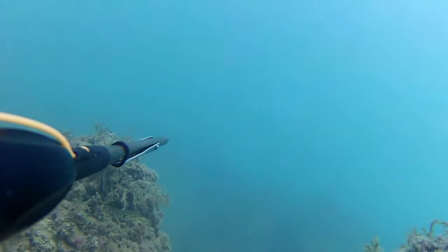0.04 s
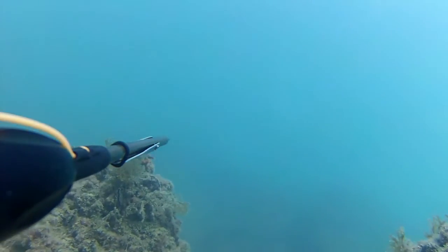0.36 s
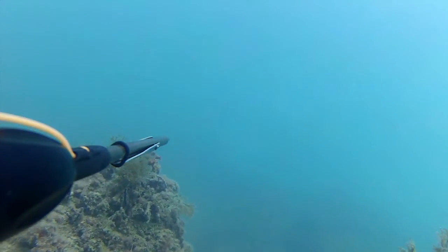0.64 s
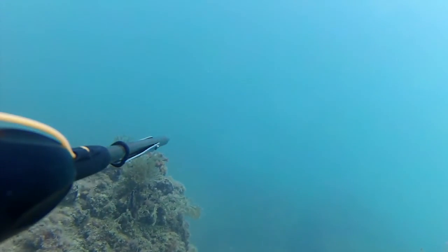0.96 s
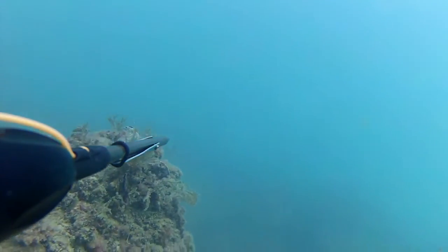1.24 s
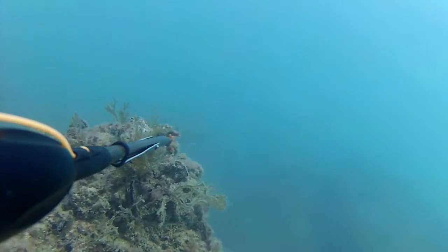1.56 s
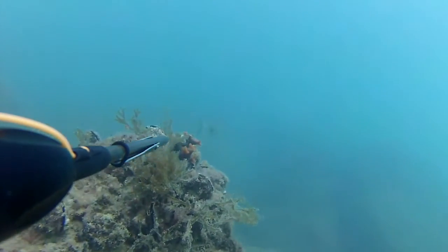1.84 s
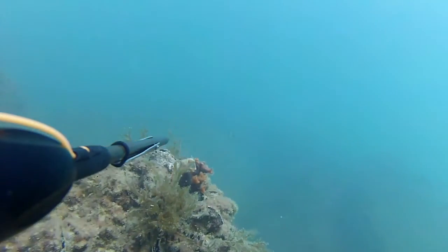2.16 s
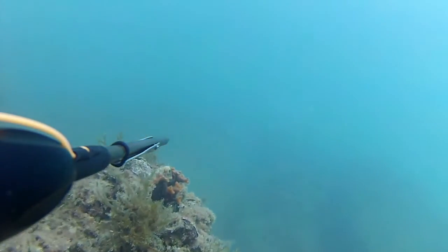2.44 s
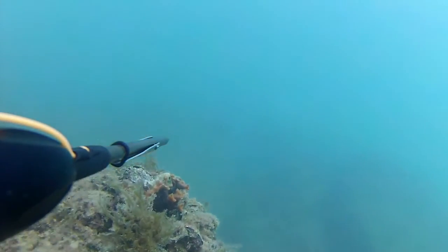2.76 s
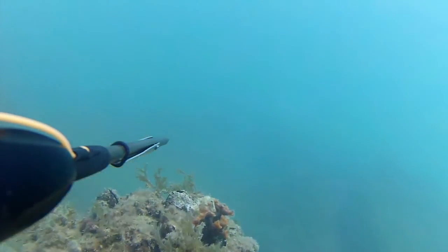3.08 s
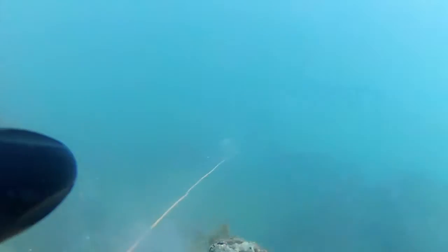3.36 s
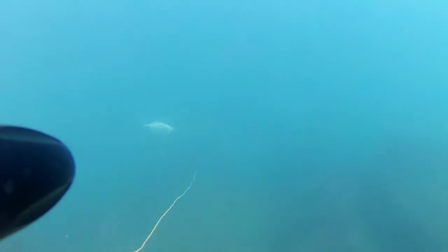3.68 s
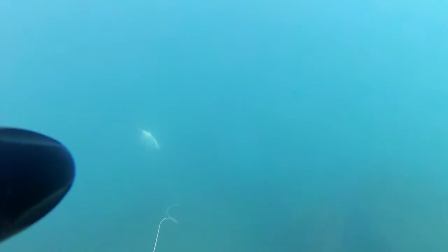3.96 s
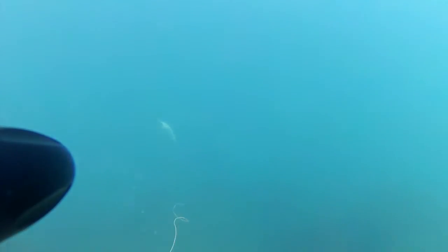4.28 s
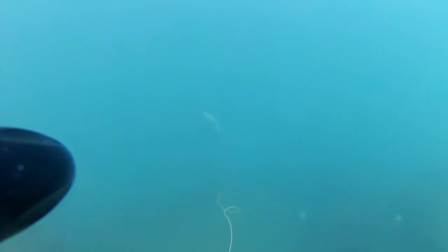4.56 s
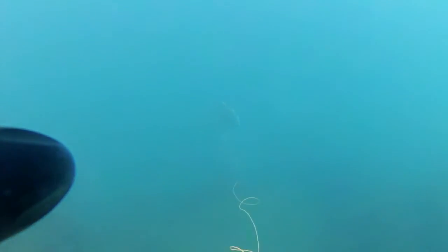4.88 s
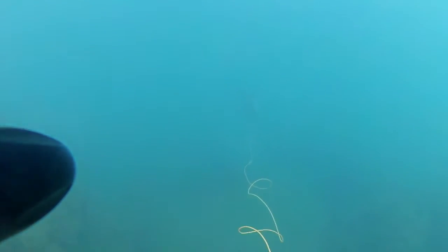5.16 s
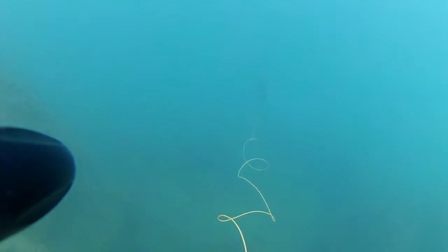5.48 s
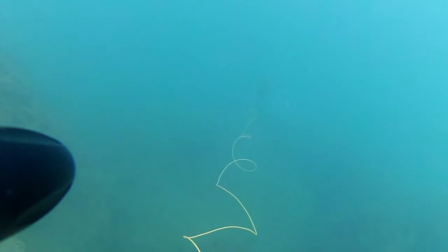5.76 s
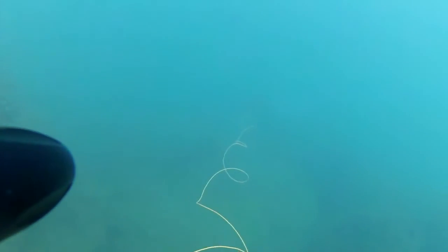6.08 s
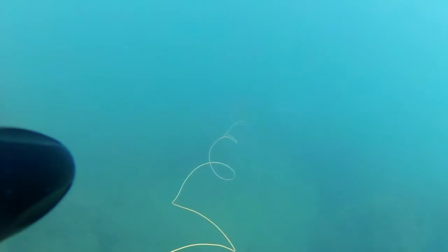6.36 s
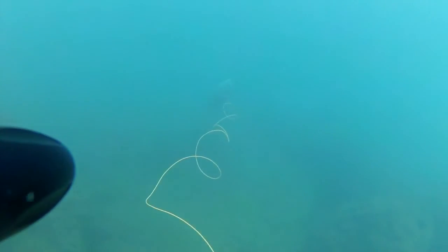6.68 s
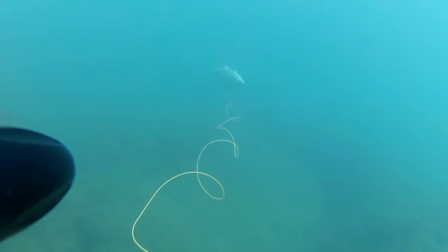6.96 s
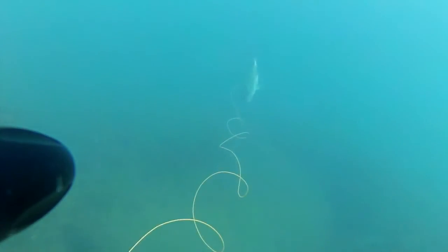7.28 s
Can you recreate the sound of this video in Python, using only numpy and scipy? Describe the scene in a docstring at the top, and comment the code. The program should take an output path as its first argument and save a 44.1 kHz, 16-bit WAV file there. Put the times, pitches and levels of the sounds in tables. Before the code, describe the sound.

Throughout, snapping shrimp crackle faintly on an underwater reef, with scattered closer clicks over a soft hiss, a low wash and a faint, steady high tone from the camera housing. Soft knocks and scuffs of gear come around 0.7 to 1.5 seconds and just before 3. At about 3.2 seconds a speargun fires right beside the microphone: a brief scrape and three rapid thuds run into one hard, slightly distorted crack, by far the loudest sound. Bubbles fizz, water surges and the line rattles out while the background briefly dips. A small bubble blips at 3.6 seconds, the steel shaft clinks at 3.7, and the line tugs with a soft, low thump at 3.9. The crackle continues, with sharper snaps at 4.5 and 4.9 seconds. Between 6.5 and 7.1 seconds come quiet knocks, a short creak of the line and a light scuff.

```python
"""Snapping shrimp crackle all round over a low wash of water, heard on a reef from inside a camera
housing that they keep faintly ringing. Right beside the microphone a speargun fires: the shaft scrapes
out, three pressure pulses hit and duck the gain, then a hard crack overloads the input and the
background stays low for a moment. The line runs out, tugs at the gun and later creaks."""
import sys
import numpy as np
from scipy import signal
from scipy.fft import rfft, irfft
from scipy.io import wavfile
from scipy.ndimage import map_coordinates

SR = 44100
rng = np.random.default_rng(int(sys.argv[2]) if len(sys.argv) > 2 else 0)


def wrap_up_sound(samples):
    """Save the sound to the file named by the first command line argument, as 16-bit audio."""
    columns = np.atleast_2d(samples).T
    # keep every value between -1 and 1, then stretch to whole-number steps
    tamed = np.clip(columns, -1, 1)
    steps = np.round(tamed * 32767).astype(np.int16)
    wavfile.write(sys.argv[1], SR, steps)


N = 322812
TIME = np.arange(N) / SR
AGE = TIME[:SR // 4]  # seconds since the start of one short sound
FIRE_AT, CRACK_AT = 3.195, 3.2579  # the shaft starts to move; the gun's stroke ends [s]


def amp(db):
    """Decibels to gain."""
    return 10 ** (np.asarray(db) / 20)


def unit(x):
    """Scaled to rms 1."""
    return x / np.sqrt(np.mean(x ** 2) + 1e-20)


def fade(t60, age=AGE):
    """A decay of 60 dB in t60 seconds."""
    return np.exp(-np.log(1000) * age / t60)


def envelope(start, attack, hold, t60):
    """Rises from start, holds, then dies away; all in seconds."""
    age = np.maximum(TIME - start, 0)
    return (1 - np.exp(-age / attack)) * fade(t60, np.maximum(age - hold, 0))


def curve(rows):
    """One value per sample from (time, value) points."""
    return np.interp(TIME, *np.transpose(rows))


def add(track, at, sound):
    """Mixes a sound in at the given second."""
    part = track[round(at * SR):][:len(sound)]
    part += sound[:len(part)]


def coloured(x, points, size=4096):
    """x through a minimum-phase filter shaped by (Hz, dB) points."""
    hz, db = np.transpose(points)
    gain = amp(np.interp(np.log(np.fft.rfftfreq(size, 1 / SR) + 1), np.log(hz), db))
    cepstrum = irfft(np.log(gain))
    cepstrum[1:size // 2] *= 2
    cepstrum[size // 2 + 1:] = 0
    return signal.fftconvolve(x, irfft(np.exp(rfft(cepstrum))))[:len(x)]


def noise(points, count=N):
    """Coloured noise of rms 1."""
    return unit(coloured(rng.standard_normal(count), points))


def wobble(rate):
    """A wandering random curve, rate knots a second."""
    knots = rng.standard_normal(int(N * rate / SR) + 4)
    return map_coordinates(knots, [TIME * rate], order=1)


def ring(modes, spread_db):
    """Damped modes of alternating sign, struck at slightly new strengths each time."""
    out = np.zeros(len(AGE))
    for k, (hz, db, t60) in enumerate(modes):
        strength = (-1) ** k * amp(db + spread_db * rng.standard_normal())
        out += strength * fade(t60) * np.sin(2 * np.pi * hz * AGE)
    return out


def burst(colour, t60):
    """A short dying burst of coloured noise; peak 1."""
    x = coloured(rng.standard_normal(len(AGE)) * fade(t60), colour)
    return x / np.abs(x).max()


# The hiss of the sea all round (frequency [Hz], level [dB])
SEA_COLOUR = [(15, -31.5), (25, -4.5), (64, 1), (433, -5), (1020, -11), (1340, -11), (2170, -18.5),
              (2490, -15), (2770, -16), (4620, -22.5), (6550, -18.5), (10100, -23), (10900, -23.5),
              (12800, -22), (15500, -32.5)]
# Water flowing past the housing (time [s], level [dB])
WASH_LEVEL = [(0, -66.5), (.8, -72), (1.5, -60), (2.3, -54), (3.7, -56.5), (4.4, -65), (5.4, -68.5),
              (6.4, -64), (7.3, -63)]
# Its rumble at the microphone (frequency [Hz], level [dB])
WASH_COLOUR = [(10, -13), (28, -2), (48, 1.5), (80, -14), (200, -31), (600, -70)]
# The gun moves close by and stirs the water (middle [s], half length [s], level [dB])
SWIRLS = [(0.146, .06, -59), (0.386, .07, -60.5), (3.919, .25, -61), (6.749, .25, -65.5)]
# Stirred water, close up (frequency [Hz], level [dB])
CHURN_COLOUR = [(15, -15.5), (45, -1), (180, -2), (450, -7.5), (900, -21), (1600, -40), (4000, -68.5)]
def water(tone_hz=2520, tone_width_hz=170, tone_db=-75, flutter_db=4.5, hiss_db=-61.5):
    """Steady hiss, a low wash, soft swirls, and the housing resonance singing unevenly."""
    resonance = np.exp(-np.pi * tone_width_hz * AGE) * np.sin(2 * np.pi * tone_hz * AGE)
    drive = rng.standard_normal(N) * amp(flutter_db * wobble(40))  # stands for the shrimp's crackle
    tone = amp(tone_db) * unit(signal.fftconvolve(drive, resonance)[:N])
    hiss = amp(hiss_db) * noise(SEA_COLOUR)
    wash = amp(curve(WASH_LEVEL)) * noise(WASH_COLOUR)
    stir = sum(amp(db) * np.exp(-((TIME - at) / half) ** 2) for at, half, db in SWIRLS)
    return hiss + wash + stir * noise(CHURN_COLOUR) + tone


# One shrimp snap as it reaches the microphone (frequency [Hz], level [dB])
SNAP_COLOUR = [(100, -12), (700, -4), (1300, -1), (1700, -6), (2400, -0.5), (4000, -2), (5300, -3),
               (6400, -5.5), (8800, -4), (11000, -10.5), (15500, -12.5)]
# Modes of the housing round the microphone (frequency [Hz], level [dB], t60 [s])
HOUSING_MODES = [(1322, -24, .039), (1984, -22, .025), (2500, -15.5, 0.031)]
def snap(treble_db, rise=0.000091, burst_t60=0.0049, scatter_db=-20, scatter_t60=.05):
    """A collapsing bubble: a very short burst, scatter off the rocks, and the housing's ring; peak 1."""
    pop = rng.standard_normal(len(AGE)) * (fade(burst_t60) + amp(scatter_db) * fade(scatter_t60))
    onset = 1 - np.exp(-AGE / rise)
    click = onset * (coloured(pop, SNAP_COLOUR) + ring(HOUSING_MODES, spread_db=2.5))
    click = coloured(click, [(2500, 0.00076), (6000, treble_db)])
    return click / np.abs(click).max()


# Distant patches of reef, each with its own pitch of crackle (frequency [Hz], level [dB])
REEF_PATCHES = [(1400, -3.5), (2500, -3.5), (6200, -2), (6900, -1.5), (7500, -1), (8700, 0), (9800, -1.5),
                (12500, -2)]
def far_shrimp(rate=17, spread_db=7.5, far_db=-56, skirt_db=-17):
    """A crowd of far snaps, about rate a second from each patch of reef."""
    out = np.zeros(N)
    for hz, db in REEF_PATCHES:
        band = [(hz / 2, skirt_db), (hz, 0), (hz * 2, skirt_db)]
        voices = [coloured(snap(treble_db=0)[:2048], band) for _ in range(5)]
        times = np.cumsum(rng.exponential(1 / rate, size=250))
        peaks = amp(far_db + db + spread_db * np.minimum(rng.standard_normal(len(times)), 2))
        for k, at in enumerate(times):
            click = voices[k % len(voices)]
            add(out, at, peaks[k] * click / np.abs(click).max())
    return out


def stray_shrimp(count=38, level_db=-45, spread_db=3, treble_db=1, treble_spread_db=11):
    """Chance snaps in the middle distance; the nearer the microphone, the louder and brighter."""
    out = np.zeros(N)
    for k, (offset, nearness) in enumerate(rng.uniform([0, -1], [1, 1], (count, 2))):
        click = snap(treble_db + treble_spread_db * nearness)
        add(out, (k + offset) / count * N / SR, amp(level_db + spread_db * nearness) * click)
    return out


# The shrimp nearest the microphone (time [s], level [dB], treble [dB])
NEAR_SNAPS = [(0.0833, -38, 5), (0.4314, -40.5, -5.5), (1.0021, -35, 19), (1.2528, -37.5, -12),
              (2.0712, -30.5, 3.5), (2.358, -38.5, -5.5), (2.617, -36, 23), (2.6482, -26.5, 12.5),
              (4.2067, -35, -4), (4.3326, -37.5, -4), (4.5004, -24.5, 0.5), (4.6547, -35.5, -0.5),
              (4.9146, -22, 2), (5.147, -34.5, -10.5), (5.2208, -37.5, -7), (5.4312, -35.5, 2),
              (6.0115, -35, 12), (6.2208, -35.5, 4), (6.4922, -42, -16), (7.2449, -38.5, -1)]
def near_shrimp():
    """Single loud snaps from the rock under the gun."""
    out = np.zeros(N)
    for at, db, treble_db in NEAR_SNAPS:
        add(out, at, amp(db) * snap(treble_db))
    return out


# Knocks on the grip, close by (time [s], level [dB], t60 [s])
GRIP_KNOCKS = [(1.326, -42.5, 0.012), (1.535, -43, 0.048), (6.495, -48.5, 0.027), (6.657, -45.5, .029)]
# A dull knock on the gun (frequency [Hz], level [dB])
KNOCK_COLOUR = [(40, -25), (110, -4), (200, 0.5), (310, -2.5), (440, -1), (620, -6.5), (1400, -16),
                (1900, -38), (6000, -45)]
# Gear scuffing near the housing (time [s], level [dB], t60 [s])
GEAR_SCUFFS = [(.718, -44.5, .026), (1.256, -42, .11), (2.938, -39, 0.074), (7.088, -41.5, .11)]
# The crunch of one scuff (frequency [Hz], level [dB])
SCUFF_COLOUR = [(300, -4), (900, -3), (1350, 15.5), (1750, -1), (2500, 12), (3500, -4), (4500, -10),
                (12000, -11.5)]
def handling():
    """The grip knocks dully; gear scuffs in brighter crunches."""
    out = np.zeros(N)
    for rows, colour in (GRIP_KNOCKS, KNOCK_COLOUR), (GEAR_SCUFFS, SCUFF_COLOUR):
        for at, db, t60 in rows:
            add(out, at, amp(db) * burst(colour, t60))
    return out


# Runs of slips in the taut line, heard through the gun (time [s], length [s], level [dB])
LINE_CREAKS = [(6.727, .045, -41.5), (6.79, .025, -41.5), (6.865, .015, -41.5)]
def line_creaks(slips_per_s=79, slip_t60=0.047, jitter_s=0.0024, spread_db=3.5):
    """The line sticks and slips at an uneven pace; every slip knocks the gun."""
    out = np.zeros(N)
    for start, length, db in LINE_CREAKS:
        for at in np.arange(start, start + length, 1 / slips_per_s):
            late, strength = rng.standard_normal(2)
            slip = amp(db + spread_db * strength) * burst(KNOCK_COLOUR, slip_t60)
            add(out, at + jitter_s * late, slip)
    return out


def line_tug(at=3.929, thump_db=-33, rest_hz=60, start_hz=190, settle=0.008, length=.048, knock_db=-41):
    """The line snaps taut: a knock, and a thump that sinks in pitch as the gun swings."""
    out = np.zeros(N)
    hz = rest_hz + (start_hz - rest_hz) * np.exp(-AGE / settle)
    swell = (1 - np.exp(-AGE / 0.0018)) * np.exp(-(AGE / length) ** 2)
    thump = amp(thump_db) * swell * np.sin(2 * np.pi * np.cumsum(hz) / SR)
    add(out, at, amp(knock_db) * burst(KNOCK_COLOUR, t60=.04) - thump)
    return out


# Out on the line, the shaft clinks as it is checked (time [s], level [dB])
SHAFT_CLINKS = [(3.697, -41.5), (3.707, -36.5)]
# Modes of the steel shaft (frequency [Hz], level [dB], t60 [s])
SHAFT_MODES = [(1270, -1.5, 0.073), (2590, -3.5, 0.036), (3120, -4, .024), (5420, -6, .05),
               (7400, -11, .025)]
def shaft_clinks(tick_db=3, knock_db=-1.5):
    """Each contact ticks, knocks the gun and leaves the steel ringing briefly."""
    out = np.zeros(N)
    for at, db in SHAFT_CLINKS:
        knock = amp(knock_db) * burst(KNOCK_COLOUR, t60=0.043)
        steel = .5 * ring(SHAFT_MODES, spread_db=5)
        tick = amp(tick_db) * snap(treble_db=-3)
        add(out, at, amp(db) * (steel + tick + knock))
    return out


def bubble(at=3.6385, db=-38, hz=1330, t60=0.041, rise=.0006):
    """A single bubble breaks loose and rings."""
    out = np.zeros(N)
    add(out, at, amp(db) * (1 - np.exp(-AGE / rise)) * fade(t60) * np.sin(2 * np.pi * hz * AGE))
    return out


# Fine bubbles fizzing beside the housing (frequency [Hz], level [dB])
FIZZ_COLOUR = [(1000, -28.5), (3000, -4.5), (4500, -7.5), (6200, 3), (8000, -2.5), (10000, -1.5),
               (12000, -10.5), (16000, -18.5)]
def bubble_cloud(level_db=-30, speed_power=2.4, spray_db=-27, uneven_db=4):
    """Fine bubbles fizz more as the shaft gathers speed; the crack throws out a last spray of them."""
    speed = np.clip((TIME - FIRE_AT) / (CRACK_AT - FIRE_AT), 0, 1) * (TIME < CRACK_AT)
    trail = amp(level_db) * speed ** speed_power
    spray = amp(spray_db) * envelope(CRACK_AT, attack=.001, hold=.004, t60=0.11)
    return (trail + spray) * amp(uneven_db * wobble(500)) * noise(FIZZ_COLOUR)


def wake(surge_db=-9, eddies_db=-33.5):
    """The shot leaves a short surge of water, then slowly settling eddies."""
    surge = amp(surge_db) * envelope(CRACK_AT, attack=.005, hold=0.025, t60=0.085)
    eddies = amp(eddies_db) * envelope(CRACK_AT, attack=.02, hold=.03, t60=1.05)
    return (surge + eddies) * noise(CHURN_COLOUR)


# Shaft, then loops of line, run over the muzzle (time [s], length [s], rattle [dB], stirred water [dB])
MUZZLE_SCRAPES = [(3.193, .06, -30, -24.5), (3.28, 0.055, -35.5, -33), (3.392, 0.048, -45.5, -34)]
# The muzzle's rattle at close range (frequency [Hz], level [dB])
RATTLE_COLOUR = [(300, -30.5), (900, -6.5), (1350, 5.5), (1700, -4.5), (2000, -12), (2450, -6.5),
                 (3100, -21), (5000, -38.5), (12000, -61)]
def muzzle_scrapes(uneven_db=3.5, hiss_db=-30):
    """Shaft and line rattle unevenly on the muzzle and stir the water as they pass."""
    rattle, stir = np.zeros(N), np.zeros(N)
    for at, length, rattle_db, stir_db in MUZZLE_SCRAPES:
        contact = envelope(at, attack=0.0049, hold=length, t60=0.086)
        rattle += amp(rattle_db) * contact
        stir += amp(stir_db) * contact
    rattle *= amp(uneven_db * wobble(250))
    friction = noise(RATTLE_COLOUR) + amp(hiss_db) * noise(FIZZ_COLOUR)
    return rattle * friction + stir * noise(CHURN_COLOUR)


# Pressure pulses hit the housing as the shaft leaves (time [s], level [dB], sign, rise [s], decay [s])
PRESSURE_PULSES = [(3.212, 5, 1, .00042, .0007), (3.2163, 10, -1, .00005, .00089),
                   (3.2218, 14, 1, .0008, .0012)]
# The crack, right beside the microphone (frequency [Hz], level [dB])
CRACK_COLOUR = [(100, -5.5), (600, 4.5), (2400, 2.5), (4300, -10), (8500, -7), (15000, -17)]
# Modes of the gun's body (frequency [Hz], level [dB], t60 [s])
GUN_MODES = [(48, -10.5, .22), (88, -1, .1), (148, -3, 0.11), (260, -2.5, .06), (423, 10.5, 0.03),
             (611, 15.5, 0.026), (1240, 13.5, .025), (1430, -21, .23), (1697, -23, .17), (1918, 15, .02),
             (2356, 14.5, 0.015), (3300, 5.5, .021), (5200, 4, .019)]
def shot(crack_db=13, crack_t60=.018, rebound_hz=30):
    """Pressure pulses, each with a shallow rebound, then the crack that rings the whole gun."""
    pulses = np.zeros(N)
    for at, db, sign, rise, decay in PRESSURE_PULSES:
        add(pulses, at, sign * amp(db) * (1 - np.exp(-AGE / rise)) * np.exp(-AGE / decay))
    out = signal.lfilter(*signal.butter(1, rebound_hz, "high", fs=SR), pulses)
    crack = amp(crack_db) * fade(crack_t60) * noise(CRACK_COLOUR, count=len(AGE))
    add(out, CRACK_AT, crack - ring(GUN_MODES, spread_db=1))
    return out


# Nearness of the crackling rock to the microphone (time [s], level [dB])
REEF_NEARNESS = [(0, 1.5), (3, 2), (4, -0.5), (7.3, 0)]
def scene():
    """Everything that reaches the one microphone: the reef all round and the gun beside it."""
    sea = water() + near_shrimp() + amp(curve(REEF_NEARNESS)) * (stray_shrimp() + far_shrimp())
    firing = shot() + muzzle_scrapes() + wake() + bubble_cloud() + bubble()
    tackle = shaft_clinks() + line_tug() + handling() + line_creaks()
    return (sea + firing + tackle)[None]


def gain_control(x, threshold_db=-8, depth_db=14, most_over_db=28, release_db_per_s=58, attack=.016):
    """An overload turns the gain down by up to depth_db; it holds, then creeps back."""
    level_db = 20 * np.log10(np.abs(x) + 1e-9)
    over_db = np.clip(level_db - threshold_db, 0, most_over_db)  # the detector saturates
    release_db = release_db_per_s * TIME
    held_db = np.maximum.accumulate(over_db + release_db, axis=-1) - release_db
    pole = np.exp(-1 / (attack * SR))
    duck_db = signal.lfilter([1 - pole], [1, -pole], np.minimum(held_db, depth_db))
    return x * amp(-duck_db)


def record(dry):
    """The gain ducks at the pressure pulses, the crack still clips softly, and the top treble is cut."""
    ceiling, top_hz, slope_hz = .96, 15900, 600
    ducked = gain_control(dry)
    clipped = ducked / (1 + (np.abs(ducked) / ceiling) ** 6) ** (1 / 6)
    passband = np.clip((top_hz - np.fft.rfftfreq(N, 1 / SR)) / slope_hz, 0, 1)
    return irfft(rfft(clipped) * passband, N)


dry = scene()
out = record(dry)
wrap_up_sound(out)
```